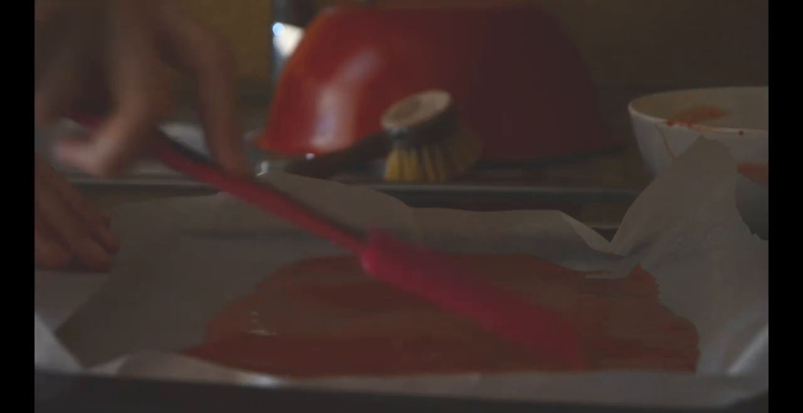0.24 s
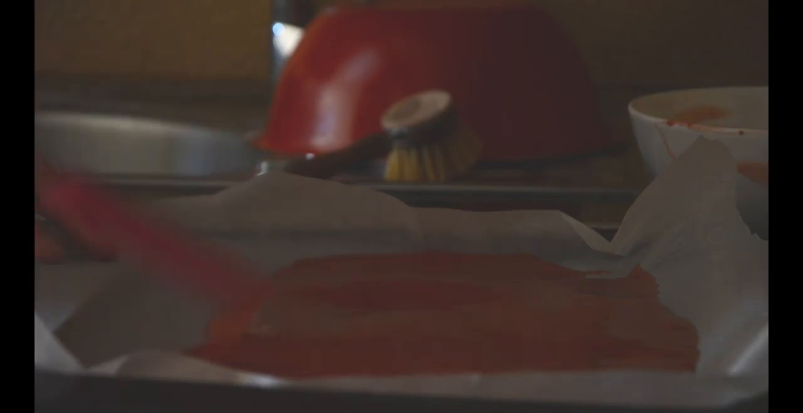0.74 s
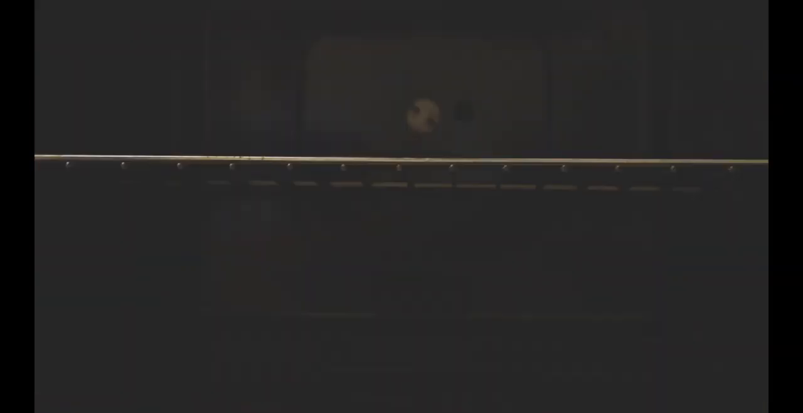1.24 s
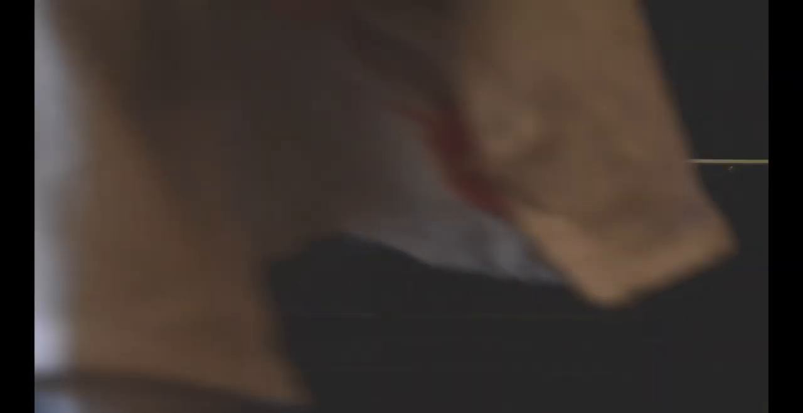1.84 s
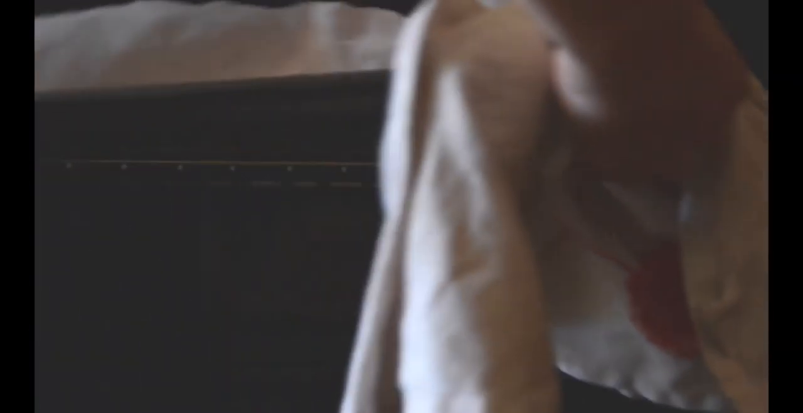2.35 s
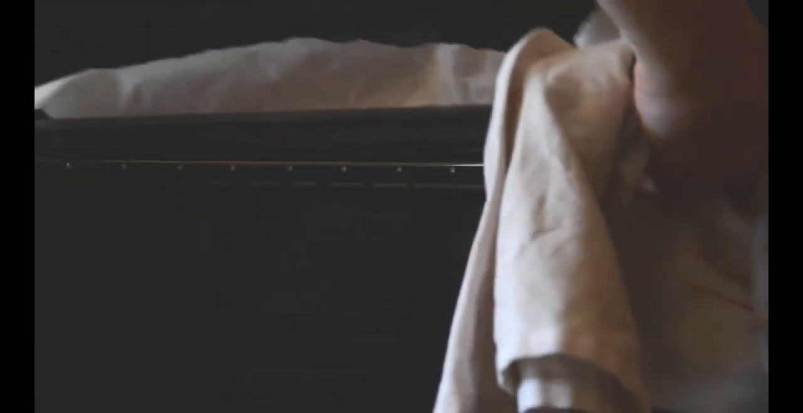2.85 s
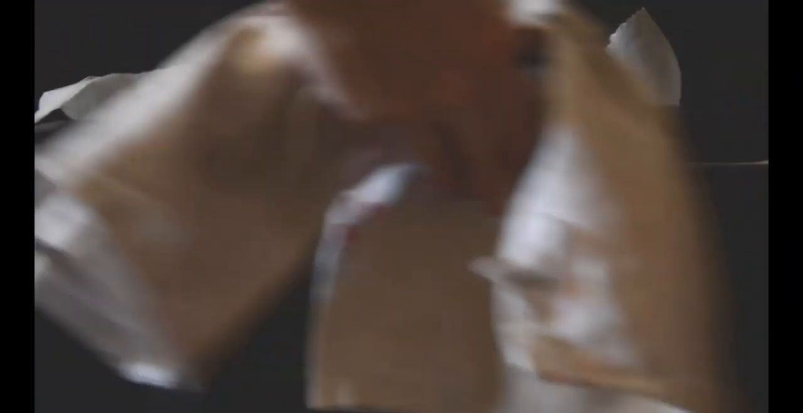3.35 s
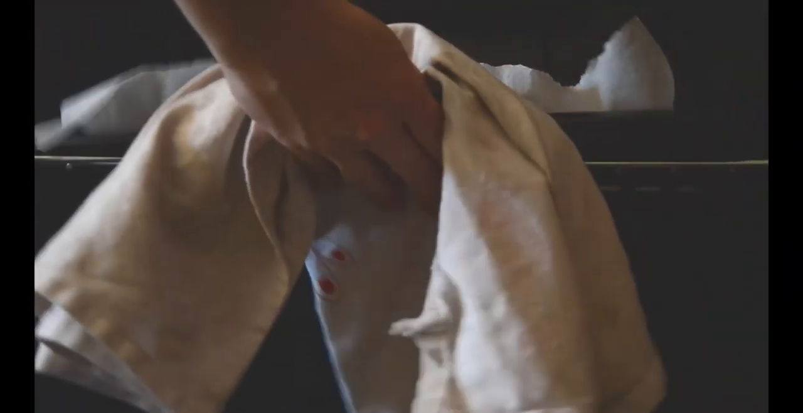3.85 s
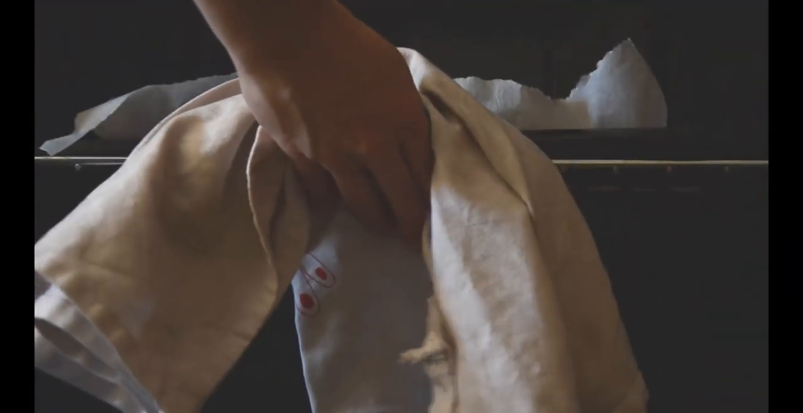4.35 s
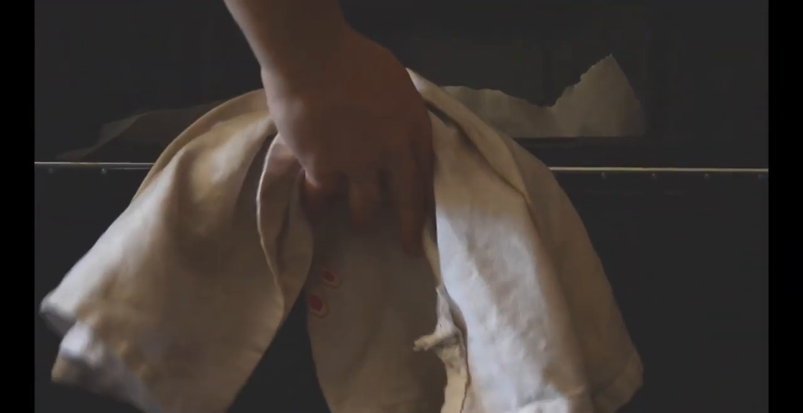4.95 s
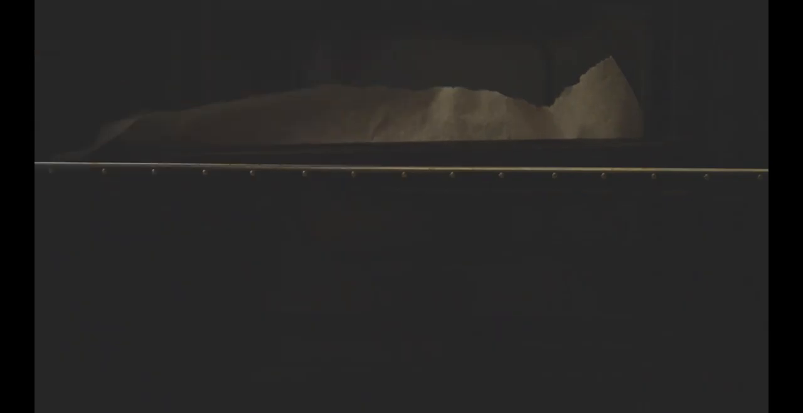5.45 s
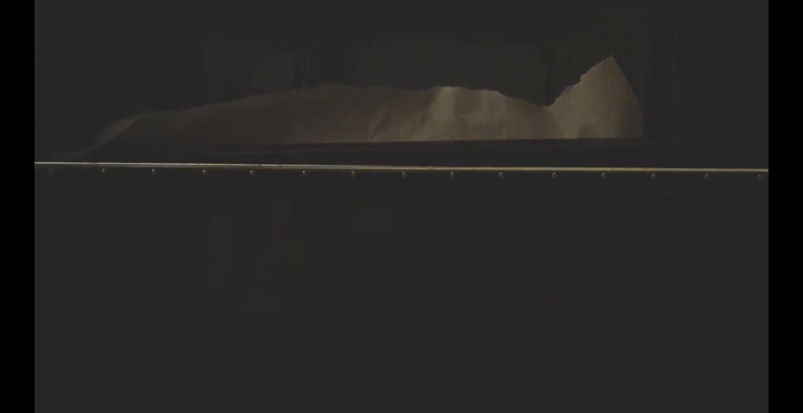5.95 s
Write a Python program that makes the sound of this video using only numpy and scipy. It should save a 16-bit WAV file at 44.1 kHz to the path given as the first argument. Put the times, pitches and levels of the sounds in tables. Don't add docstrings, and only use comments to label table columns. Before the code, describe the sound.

Close to the microphone in a quiet kitchen, a soft spatula makes faint wet dabs. An abrupt change brings low oven fan noise. A thin metal tray hits the wire rack, clattering and scraping inward, pauses, knocks loudly again, then slides with small squeals into the back wall with a booming metallic clank. Ringing fades under soft pats and cloth and paper rustle.

```python
import sys
import numpy as np
from scipy import signal
from scipy.fft import rfft, irfft, next_fast_len
from scipy.io import wavfile

SR = 44100
rng = np.random.default_rng(int(sys.argv[2]) if len(sys.argv) > 2 else 0)


def master(y):
    cut = np.clip(np.atleast_2d(y).T, -1, 1)
    pcm = np.round(cut * 32767)
    wavfile.write(sys.argv[1], SR, pcm.astype(np.int16))


def nominal_scale(level):
    x = np.asarray(level, float) / 20
    return 10 ** x


N = 273810

# start in seconds, peak in dB, hardness as sizzle in dB re peak, rattle in seconds.
KNOCKS = [(1.962, -54, -7.5, 0.011), (2.024, -44, -21, 0.027), (2.101, -17, -24.5, 0.00764),
          (2.149, -27.5, -31, 0.069), (2.397, -28, -26, 0.03), (2.455, -17, -20.5, 0.008),
          (2.462, -15, -20.5, 0.015), (2.489, -24, -9.5, 0.016), (2.567, -17.5, -20, 0.0204),
          (2.585, -18.5, -16.5, 0.0101), (2.636, -20, -17, 0.012), (2.653, -22, -19, .012),
          (2.692, -24, -19, .008), (2.703, -21, -21, 0.0081), (2.73, -28, -22, .01),
          (2.758, -40, -41, 0.0097), (2.813, -32, -31.5, 0.0104), (2.922, -42, -25, .008),
          (2.945, -33, -26, 0.0163), (2.991, -42, -47, 0.0197), (3.639, -50, -13.5, 0.022),
          (3.8785, -22, -16, .004), (3.882, -12, -27, 0.008), (3.888, -16, -20, .008),
          (3.894, -17, -16, .008), (3.902, -17, -15, 0.01), (3.912, -17, -17, .01),
          (3.93, -16.5, -36.5, 0.0156), (3.959, -24.5, -16.5, 0.019), (3.985, -20.5, -21, 0.0282),
          (4.008, -24, -21, .012), (4.022, -24, -23, 0.015), (4.083, -30.5, -17, 0.0108),
          (4.105, -33, -21, .015), (4.153, -46, -42, 0.039), (4.298, -37, -33, 0.02085),
          (4.329, -36.5, -31.5, 0.018), (4.346, -40, -28, .012), (4.415, -42, -26, .012),
          (4.446, -42, -26, .012), (4.65, -40, -24, .015), (4.666, -38, -22, 0.015), (4.712, -37, -22, .02),
          (5.692, -42, -30, .008), (5.7, -41, -40, 0.004), (5.958, -50, -23, 0.0163),
          (6.084, -45.5, -35.5, 0.0122)]
# time in seconds, pressure as scrape level in dB, speed from 0 to 1.
SLIDES = [
    [(2.5, -38, 0.78), (2.54, -35, 1), (2.594, -30, 0.87), (2.714, -29.5, 0.72), (2.884, -51, 0.44),
     (2.908, -40, .3), (3.0, -62, 0.16)],
    [(3.62, -61.5, 0.39), (3.654, -65, 0.19), (3.684, -44.5, 0.21), (3.8, -41.5, 0.72), (3.818, -56, .2),
     (3.865, -32, 0.51)],
    [(4.17, -45.5, 0.19), (4.2, -58.5, 0.12), (4.296, -41, 0.33), (4.468, -41.5, 0.61), (4.7, -38.5, .75),
     (4.794, -40.5, 0.81), (4.815, -34.5, 0.32)],
]
# frequency in Hz, level in dB per Hz.
SHEETS = [
    [(35, -54.5), (60, -8.5), (107, -16.5), (149, 4.5), (201, -17), (236, -4.5), (376, -10), (533, -2.5),
     (738, -4.5), (889, -9.5), (1480, -8.5), (2800, -17.5), (5200, -32.5), (15500, -54.5)],
    [(35, -57.5), (60, -43), (149, 2), (206, -9), (312, -3.5), (403, -8), (559, 1.5), (999, -6.5),
     (1200, -4), (3120, -14.5), (6120, -36.5), (12000, -42), (15500, -60.5)],
    [(35, -54.5), (60, -24), (102, -37.5), (145, 0), (201, -10.5), (312, -7.5), (351, -14.5), (443, -3.5),
     (509, -4), (976, -11), (1170, -8), (1700, -10.5), (2910, -20.5), (15500, -59)],
    [(35, -47.5), (60, -43), (129, 0), (201, -14.5), (242, -5.5), (403, -9.5), (475, -10.5), (521, 0),
     (976, -13), (1230, -7), (3120, -18.5), (5980, -38.5), (15500, -48.5)],
]
MOVED_S = (0, 2.3, 3.3, 4.19, 7)
# frequency in Hz, t60 in seconds.
SHEET_T60 = [(100, 0.93), (300, 0.719), (1000, 0.5644), (3000, 0.423), (6000, 0.348), (12000, 0.186)]
# frequency in Hz, level in dB, t60 in seconds.
PANEL = [(157.9, -2.5, 0.317), (548.22, -10, 0.7), (331.77, -0.5, 0.36), (1175, -6, 0.13),
         (248.8, -2, 0.59)]
SPLIT_HZ = (400, 3000)
# time in seconds, level in dB, seconds to fall 20 dB.
SINGING = [
    (2.55, -40.5, .5),
    (2.9, -41.5, 0.1252),
    (3.79, -42, 0.33),
    (4.33, -33, 0.3),
]
# frequency in Hz, width in Hz, level in dB.
RAIL = [(236, 9.4, -4), (461.14, 15.3, 0), (743.9, 37, -1.5)]
# start in seconds, peak in dB, crack in dB.
CLANK = [
    (4.8412, -3, -37),
    (4.8447, -19, -33),
]
# frequency in Hz, level in dB, t60 in seconds.
WALL = [(144.63, -8, 1.69), (174.5, -14.5, 1.1), (233, -17.5, 1.718), (280.6, -12.5, 0.95),
        (331.6, -16, .4), (493, -10, 0.64), (557, -13, 0.53), (680.8, -18.5, 1.373), (701.6, -9, 0.465),
        (811.97, -9, 0.52), (877, -5.5, 0.53), (934, -10, 0.25), (985, -14.5, 0.55), (1065, -9.5, 0.68)]
# frequency in Hz, level in dB per Hz.
CLANK_SHEET = [(24, -68.5), (40, -31), (139, -2.5), (202, -10), (280, -6.5), (325, -1.5), (417, -11.5),
               (484, -12.5), (522, 0), (704, -5), (1130, -9.5), (2110, -20), (2390, -30.5), (15500, -66.5)]
# frequency in Hz, t60 in seconds.
CLANK_T60 = [(100, 0.82), (300, 0.89), (1000, 0.623), (1800, .53), (3000, 0.56), (6000, 0.405),
             (12000, 0.098)]
# frequency in Hz, beat in Hz, t60 in seconds.
RODS = [(441, 9, 1.2), (468, 11, 1.4), (748, 5, 2.5), (1114, 4, 2.0), (1567, 6, .8), (1303, 9, .4)]
WIRE_PLACE = (.3, 0.023, 0.624, 0.691, 0.724, 1)
WIRE_DB = (0.45, 0.3, -3, -4.5, -4.5, -1.5)
# start in seconds, level in dB, place from 0 to 1, loss in dB across the rack.
PLUCKS = [(2.47, -42.5, 0.6, 8), (2.755, -36, .3, 56), (2.97, -49, 0, 13), (3.095, -56, 0.75, 60),
          (3.16, -58, .68, 80), (3.235, -60,  .69, 80), (3.64, -46.5, 0.23, 50), (3.75, -44, .3, 60),
          (3.9, -32, 0.26, 36), (4.03, -33, 0.34, 55.5), (4.31, -47, 0.2, 44.5), (4.65, -42.5, 0, 53),
          (4.705, -44, 0, 53), (5.705, -52, 1, 53.5), (5.84, -58, 1, 60)]
# time in seconds, frequency in Hz, level in dB.
SQUEAL = [
    (4.535, 1225, -50),
    (4.57, 1225, -50.5),
    (4.603, 1215, -51),
    (4.63, 1260, -50),
    (4.685, 1200, -51),
    (4.72, 1258, -51),
    (4.76, 1210, -53),
    (4.79, 1185, -49),
]
# start in seconds, peak in dB, pitch in Hz, wetness as sizzle in dB re peak,
# top of the sizzle in Hz.
DABS = [(0.053, -40, 1173, -12, 6000), (0.202, -42.5, 1380, -26, 6000), (0.351, -36, 1140, -24, 10000),
        (0.516, -39, 940, -18, 10000), (0.635, -38, 1150, -27.5, 9000), (0.705, -35.5, 1190, -23.5, 11000),
        (0.807, -33.5, 1460, -16, 13000), (0.848, -44, 1430, -27, 13000),
        (1.063, -45.5, 1540, -13.5, 13000), (1.098, -43, 1570, -19, 13000), (1.457, -45, 800, -35, 8000),
        (1.589, -38, 568, -38, 8000), (1.61, -42, 620, -38, 8000), (5.19, -37, 689, -37, 8000),
        (5.353, -32.5, 692, -30, 10000), (5.495, -37, 810, -34.5, 10000), (5.59, -50, 1200, -12, 14000),
        (5.874, -51, 1320, -8.5, 14000), (5.925, -43, 1130, -23, 8000)]
# time in seconds, rustle in dB, seconds to fall 20 dB,
# crispness as crackle in dB re rustle.
RUSTLE = [
    [(1.47, -52, 0.26, -42), (1.63, -51.5, 0.1928, -44.5)],
    [(3.522, -53.5, 0.54, -31.5)],
    [(5.19, -46.5, .5, -30.5), (5.45, -58, 0.1846, -23), (5.73, -54.5, 0.36, -16), (6.1, -61.5, .25, -29.5)],
]
RUSTLE_HZ = (730, 1035.8, 1367)
# time in seconds, frequency in Hz, level in dB, seconds to fall 20 dB.
SQUEAK = [(5.145, 4580, -66, .08), (5.17, 3600, -67, .1), (5.18, 4350, -70, .06), (5.2, 6800, -78, .1),
          (5.25, 4600, -70, .12), (5.26, 4200, -69, .15), (5.25, 6600, -78, .08), (5.33, 4130, -71, .15),
          (5.36, 2900, -66, .1), (5.4, 4200, -70, .15), (5.4, 8400, -79, .12), (5.42, 5500, -76, .2),
          (5.46, 4050, -72, .12), (5.5, 4650, -74, .2)]
# start in seconds, level in dB, frequency in Hz.
BUMPS = [(2.4, -45, 238.6), (2.47, -32, 143.2), (2.585, -32.5, 151), (3.02, -46, 170.8), (3.13, -52, 201.4),
         (3.64, -50, 380), (3.651, -50, 148.6), (3.8, -48.5, 302), (3.85, -36, 149.5), (3.904, -25, 159.4),
         (5.7, -53, 592), (6.09, -52, 338), (6.13, -56, 211.5)]
# start in seconds, level in dB, frequency in Hz, t60 in seconds.
TICKS = [(0.352, -47, 1100, .015), (2.556, -36, 3800, .05), (5.691, -48, 2400, .006), (5.7, -36, 900, .02),
         (5.709, -39, 1350, .05), (5.926, -58, 3650, .02), (5.926, -66, 5500, .015), (5.96, -39, 750, .012),
         (6.088, -41, 900, .012), (6.115, -49, 520, .1), (6.162, -52, 900, .01)]
# frequency in Hz, level in dB per Hz.
AIR = [(18, -28), (30, -7.5), (55, -12), (97, -14.5), (181, -8), (429, -11), (939, -10), (1800, -14),
       (2530, -16.5), (2880, -21.5), (4050, -28.5), (11500, -41), (13100, -44.5), (14100, -62),
       (15300, -42)]
# frequency in Hz, level in dB per Hz.
FAN = [(18, -29), (30, 5.5), (49, -10.5), (191, -3.5), (229, -29), (298, -5.5), (723, -4.5), (1220, -9),
       (2220, -11.5), (2460, -25.5), (3040, -15.5), (4490, -30), (11500, -37), (14100, -49.5),
       (15300, -38.5)]
# frequency in Hz, width in Hz, level in dB.
HUM = [(149.23, 8.3, -72), (234.5, 5.9, -69), (879, 4.6, -80.5)]
# frequency in Hz, width in Hz, level in dB.
HISS_PEAK = [(2883.5, 138, -66.5), (1408, 5.4, -68.5)]
# time in seconds, level in dB, seconds to fall 20 dB.
THROB = [
    (1.42, -69.5, 0.26),
    (3.1, -64.5, 1.02),
    (3.5, -67, .5),
    (4.02, -51.5, 0.17),
    (4.55, -68, 0.05),
    (5.12, -57, 0.42),
    (5.47, -64, .3),
    (6.2, -67, 0.98),
]

THUD_DB, THUD_PER_DOUBLING_DB, THUD_PER_DB = -13, 3.5, -0.208
PANEL_DB, PANEL_PER_DB = -5, -0.2227
MEAN_KNOCK_DB, MEAN_RATTLE_S = -28, .018
SLOW_RUMBLE_DB, FAST_RUMBLE_DB = 6, -11.5
SLOW_HISS_DB, FAST_HISS_DB = -29.5, -11
CONTACT_MOVES_PER_S, MODE_WANDER = 37, .02
TOUCHED_FROM_S, TOUCHED_TO_S, TOUCHED_SHARE = 4, 5.0, 0.455
SLIP_DB, SQUEAL_EDGE_S = -9, 0.015
DAB_UPPER_HZ, DAB_UPPER_DB, DAB_UPPER_FOLLOWS = 2390, -0.5, 0.77
RISE_SHARE = 0.673
OVEN_FROM_S, AIR_DB, FAN_DB, BOOM_DB = 1.168, -62.5, -63.5, -75
WHINE_HZ, WHINE_DB = 15703, -82
MIC_LOW_HZ, OFFSET = 76.5, 0.00062


def tray():
    low, mid, high, panel, crack = knocks()
    rub = grains(4000, 3.0) * nominal_scale(1.5 * drift(25))
    low, mid, high = np.array([low, mid, high]) + slides(rub)
    rail = nominal_scale(-11.0) * rub * sum(swell(*row) for row in SINGING)
    panels = sum(nominal_scale(db) * ring(panel, hz, min(t60, .3)) for hz, db, t60 in PANEL)
    return sheet(low, mid, high) + between(crack, 2500, 12300) + panels + resonate(rail, RAIL)


def knocks():
    low, mid, high, panel, crack = np.zeros((5, N))
    t = np.arange(4410) / SR
    for s, db, sizzle_db, length in KNOCKS:
        harder_db = db - MEAN_KNOCK_DB
        thud_db = THUD_DB + THUD_PER_DOUBLING_DB * np.log2(length / MEAN_RATTLE_S) + THUD_PER_DB * harder_db
        panel_db = PANEL_DB + PANEL_PER_DB * harder_db
        cluster = grains(1500, 3.54, size=4410) * np.exp(-t / np.clip(length, .002, .05))
        cluster[0] = 7.0
        cluster *= nominal_scale(db + 23.5) / np.sqrt(np.sum(cluster ** 2))
        snap = rng.standard_normal(4410) * np.exp(-t / 0.0069)
        add_at(crack, s, nominal_scale(db + sizzle_db - 10.5) * snap)
        add_at(low, s, nominal_scale(min(thud_db, -2) + 12) * cluster)
        add_at(mid, s, cluster)
        add_at(high, s, nominal_scale(sizzle_db + 14.5) * cluster)
        add_at(panel, s, nominal_scale(panel_db - 38.5) * cluster)
    return low, mid, high, panel, crack


def slides(rub):
    trains = np.zeros((3, N))
    for rows in SLIDES:
        gate, db, speed = in_time(rows)
        rumble_db = SLOW_RUMBLE_DB + (FAST_RUMBLE_DB - SLOW_RUMBLE_DB) * speed
        hiss_db = SLOW_HISS_DB + (FAST_HISS_DB - SLOW_HISS_DB) * speed
        stream = gate * nominal_scale(db - 5.5) * rub
        trains += [nominal_scale(rumble_db + 5.5) * stream, stream, nominal_scale(hiss_db + 11) * stream]
    return trains


def sheet(low, mid, high):
    trains, out = np.array([low, mid, high]), np.zeros(N + SR)
    spot = (np.arange(N) / SR * CONTACT_MOVES_PER_S).astype(int) % 3 - 1
    for spectrum, start, end in zip(SHEETS, MOVED_S, MOVED_S[1:]):
        here = slice(round(start * SR), round(end * SR))
        response = dense_modes(spectrum, SHEET_T60, early_db=2, early_s=0.039)
        for place in (-1, 0, 1):
            drive = trains[:, here] * (spot[here] == place)
            part = sounded(*drive, struck_elsewhere(response, place))
            out[here.start:][:len(part)] += part
    return out[:N]


def clank():
    blow, crack = np.zeros((2, N))
    t = np.arange(882) / SR
    for s, db, crack_db in CLANK:
        blow[round(s * SR)] = nominal_scale(db)
        add_at(crack, s, nominal_scale(crack_db) * rng.standard_normal(len(t)) * np.exp(-t / .002))
    wall = 0
    for hz, level_db, t60 in WALL:
        tremble = drift(14, np.clip(hz / 250, .1, 3))
        wall = wall + nominal_scale(level_db - 17) * rng.choice([-1, 1]) * tremble * ring(blow, hz, t60)
    boom = nominal_scale(-3.5) * ring(blow, 700, 0.035) + nominal_scale(-17) * ring(blow, 2100, .02)
    boom += nominal_scale(-14) * ring(blow, 1436.7, 0.03) + nominal_scale(-24) * ring(blow, 32, 0.088)
    response = dense_modes(CLANK_SHEET, CLANK_T60, early_db=5.5, early_s=0.082)
    tail = sounded(nominal_scale(-4.0) * blow, blow, blow, response)[:N]
    return wall + boom + nominal_scale(22) * tail + between(crack, 2500, 12500)


def rack():
    s, peak_db, place, loss_db = np.transpose(PLUCKS)
    touched = (s > TOUCHED_FROM_S) & (s < TOUCHED_TO_S)
    out = gliding(catches(), wobble_hz=11.976, width_hz=10.5, clean=2.2)
    for (hz, beat_hz, t60), wire_place, wire_db in zip(RODS, WIRE_PLACE, WIRE_DB):
        db = peak_db + wire_db - loss_db * np.abs(place - wire_place)
        for when, lasting in ((~touched, t60), (touched, t60 * TOUCHED_SHARE)):
            clicks = np.zeros(N)
            clicks[np.round(s[when] * SR).astype(int)] = nominal_scale(db[when])
            chatter = drift(12, 3.0)
            out += chatter * (ring(clicks, hz, lasting) + .5 * ring(clicks, hz + beat_hz, lasting))
    return between(out, 408, 4000)


def catches():
    (first_s, first_hz, first_db), (last_s, last_hz, last_db) = SQUEAL[0], SQUEAL[-1]
    rows = [(first_s - SQUEAL_EDGE_S, first_hz, first_db + SLIP_DB)]
    for now, then in zip(SQUEAL, SQUEAL[1:]):
        slip = np.mean([now, then], axis=0) + [0, 0, SLIP_DB]
        rows += [now, tuple(slip)]
    return rows + [SQUEAL[-1], (last_s + SQUEAL_EDGE_S, last_hz, last_db + SLIP_DB)]


def gliding(rows, wobble_hz, width_hz, clean):
    gate, hz, db = in_time(rows)
    phase = 2 * np.pi * np.cumsum(hz + wobble_hz * drift(41.2)) / SR
    smear = drift(width_hz) * np.sin(phase) + drift(width_hz) * np.cos(phase)
    return gate * nominal_scale(db + 2.5) * (clean * np.sin(phase) + smear)


def dabs():
    out, t = np.zeros(N), np.arange(4410) / SR
    for s, db, hz, sizzle_db, top_hz in DABS:
        puff = rng.standard_normal(4410) * np.exp(-t / 0.0235) * (1 - np.exp(-t / 0.00054))
        body = nominal_scale(11.0) * between(puff, hz * 0.764, hz * 1.41)
        upper_db = DAB_UPPER_DB + DAB_UPPER_FOLLOWS * sizzle_db + 17.0
        upper = nominal_scale(upper_db) * between(puff, DAB_UPPER_HZ * 0.54, DAB_UPPER_HZ * 1.25)
        wet = nominal_scale(sizzle_db + 5.0) * between(puff, top_hz * .46, top_hz)
        add_at(out, s, nominal_scale(db - 14.5) * (body + upper + wet))
    return out


def paper():
    crackle = grains(6000, 2.57) * nominal_scale(1.2 * drift(7.4))
    air = np.diff(rng.standard_normal(N + 1))
    out = np.zeros(N)
    for s, hz, db, fall_s in SQUEAK:
        out += swell(s, db, fall_s) * rms_one(between(air, hz - 130, hz + 130))
    for rows, hz in zip(RUSTLE, RUSTLE_HZ):
        fine = sum(swell(s, db + crisp_db, fall_s) for s, db, fall_s, crisp_db in rows)
        dull = sum(swell(s, db, fall_s) for s, db, fall_s, crisp_db in rows)
        out += fine * nominal_scale(-5.0) * between(crackle, 3000, 9700)
        out += dull * nominal_scale(6) * between(crackle, hz * 0.332, hz * 1.294)
    return out


def bumps():
    out, t = np.zeros(N), np.arange(3300) / SR
    for s, db, hz in BUMPS:
        rounded = (1 - np.exp(-t / 0.0078)) * np.exp(-t / 0.0224)
        add_at(out, s, nominal_scale(db + 5.5) * rounded * np.sin(2 * np.pi * hz * t))
    return out


def ticks():
    out, t = np.zeros(N), np.arange(2000) / SR
    for s, db, hz, t60 in TICKS:
        add_at(out, s, nominal_scale(db - 60 * t / t60) * np.sin(2 * np.pi * hz * t))
    return out


def background():
    t = np.arange(N) / SR
    oven = np.clip((t - OVEN_FROM_S) / 0.01163, 0, 1)
    together = drift(10.6, 1.0)

    def patchy(hz):
        kitchen = (1 - oven) * nominal_scale(AIR_DB + at_hz(AIR, hz) + 22.5)
        fan = oven * nominal_scale(FAN_DB + at_hz(FAN, hz) + 19.5)
        return (kitchen + fan) * together * drift(9.2, 1.6)

    white = np.diff(rng.standard_normal(N + 1))
    cavity = [(84.3, 27, 0)]   # Hz, width Hz, dB
    boom_gain = nominal_scale(BOOM_DB) + sum(swell(*row) for row in THROB)
    boom = oven * boom_gain * rms_one(resonate(resonate(white, cavity), cavity))
    hum = oven * sum(rms_one(resonate(white, [(hz, width, 0)])) * nominal_scale(db) for hz, width, db in HUM)
    whine = nominal_scale(WHINE_DB + 1.5) * np.sin(2 * np.pi * WHINE_HZ * t)
    return coloured(patchy) + hum + boom + resonate(white, HISS_PEAK) + whine


def add_at(track, s, sound):
    room = track[round(s * SR):][:len(sound)]
    room += sound[:len(room)]


def rms_one(x):
    return x / np.sqrt(np.mean(x ** 2) + 1e-20)


def at_hz(points, hz):
    table_hz, values = np.transpose(points)
    return np.interp(np.log(hz), np.log(table_hz), values)


def in_time(rows):
    s, *columns = np.transpose(rows)
    t = np.arange(N) / SR
    gate = np.clip(np.minimum(t - s[0], s[-1] - t) / 0.0092, 0, 1)
    return [gate] + [np.interp(t, s, c) for c in columns]


def drift(rate, as_gain_db=0):
    r = np.exp(-80 * np.pi * rate / SR)
    slow = signal.lfilter([1], [1, -2 * r, r * r], rng.standard_normal(N // 40 + 2002))
    slow = rms_one(slow[2000:])
    if as_gain_db:
        slow = nominal_scale(as_gain_db * slow)
    return np.interp(np.arange(N) / 40, np.arange(len(slow)), slow)


def swell(s, db, fall_s):
    late = np.arange(0, N + 40, 40) / SR - s
    gain = nominal_scale(db - 20 * np.maximum(late, -late / RISE_SHARE) / fall_s)
    return np.interp(np.arange(N) / 40, np.arange(len(late)), gain)


def between(x, low_hz, high_hz):
    band = [low_hz, min(high_hz, 19000)]
    return signal.sosfilt(signal.butter(2, band, "band", fs=SR, output="sos"), x)


def ring(clicks, hz, t60):
    r, w = nominal_scale(-60 / (t60 * SR)), 2 * np.pi * hz / SR
    return signal.lfilter([0, np.sin(w)], [1, -2 * r * np.cos(w), r * r], clicks + 1e-18)


def resonate(x, peaks):
    return sum(nominal_scale(db) * np.sqrt(4 * np.pi * width / SR) * ring(x, hz, 2.85 / width)
               for hz, width, db in peaks)


def grains(per_s, spread_db, size=N):
    chance, height, sign = rng.random((3, size))
    return rms_one((chance < per_s / SR) * nominal_scale(-spread_db * np.log(height.clip(.01))) * np.sign(sign - .5))


def coloured(gain, size=N, count=23, even=False):
    white = rng.standard_normal((2, size + 4000))
    edges, out = np.geomspace(30, 17600, count + 1), 0
    for k, (low, high) in enumerate(zip(edges, edges[1:])):
        level = gain(np.sqrt(low * high))
        band = level * between(white[k % 2], low, high)[4000:]
        if even:
            band = band * np.sqrt(np.sum(level ** 2) * (high - low) / np.sum(band ** 2))
        out = out + band
    return out


def dense_modes(spectrum, t60s, early_db, early_s):
    t = np.arange(SR) / SR

    def dying(hz):
        t60 = at_hz(t60s, hz)
        tail = np.exp(-np.log(1000) * t / t60)
        early = nominal_scale(early_db) * np.exp(-np.log(1000) * t / early_s)
        onset = 1 - np.exp(-t * hz)
        return nominal_scale(at_hz(spectrum, hz)) * (tail + early) / np.sqrt(t60) * onset

    response = coloured(dying, size=SR, count=44, even=True)
    return response / np.sqrt(np.sum(response ** 2))


def struck_elsewhere(response, place):
    return signal.resample(response, next_fast_len(round(SR * (1 + MODE_WANDER * place))))[:SR]


def sounded(low, mid, high, response):
    size = next_fast_len(len(low) + SR)
    hz = np.arange(size // 2 + 1) * SR / size
    below = 1 / (1 + (hz / SPLIT_HZ[0]) ** 4)
    above = 1 - 1 / (1 + (hz / SPLIT_HZ[1]) ** 4)
    drive = rfft(low, size) * below + rfft(mid, size) * (1 - below - above) + rfft(high, size) * above
    return irfft(drive * rfft(response, size), size)[:len(low) + SR]


def scene():
    contacts = tray() + clank() + rack() + dabs() + paper() + bumps() + ticks()
    return (contacts + background())[None]


def low_pass(x):
    return signal.sosfilt(signal.butter(12, 15810, fs=SR, output="sos"), x)


def record(dry):
    rounded = 0.8565 * np.tanh(dry / 0.9155)
    thin = signal.sosfilt(signal.butter(2, MIC_LOW_HZ, "high", fs=SR, output="sos"), rounded)
    return low_pass(thin + OFFSET)


dry = scene()
out = record(dry)
master(out)
```